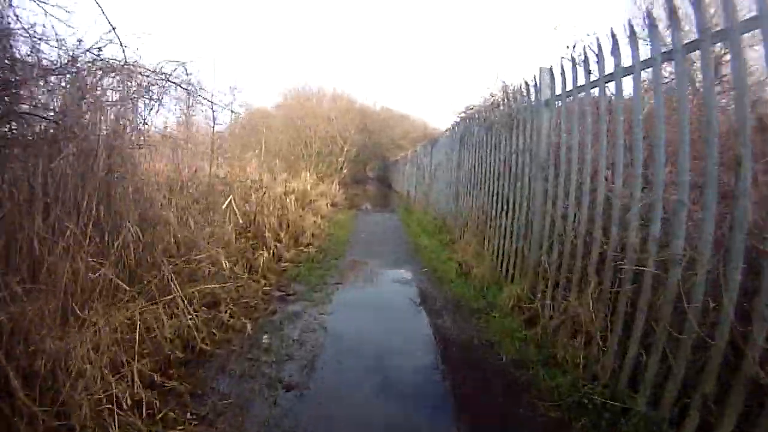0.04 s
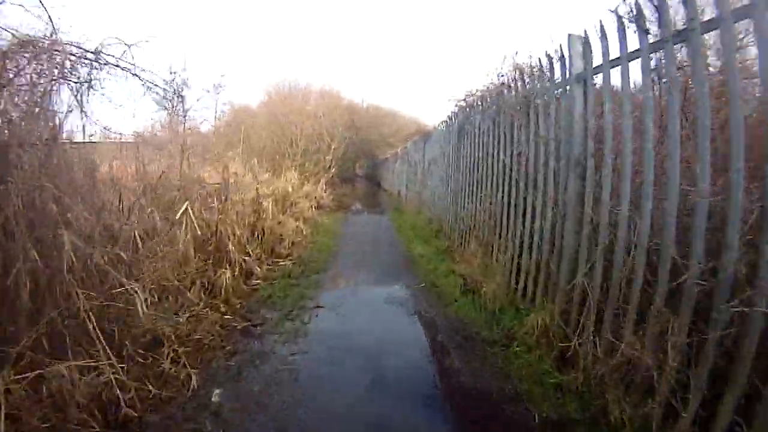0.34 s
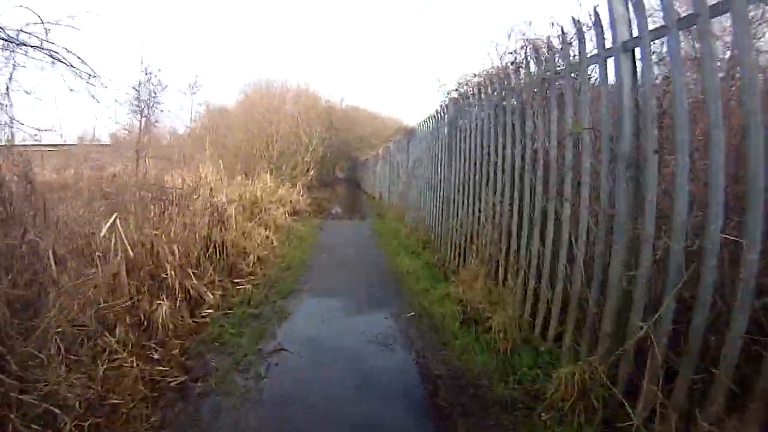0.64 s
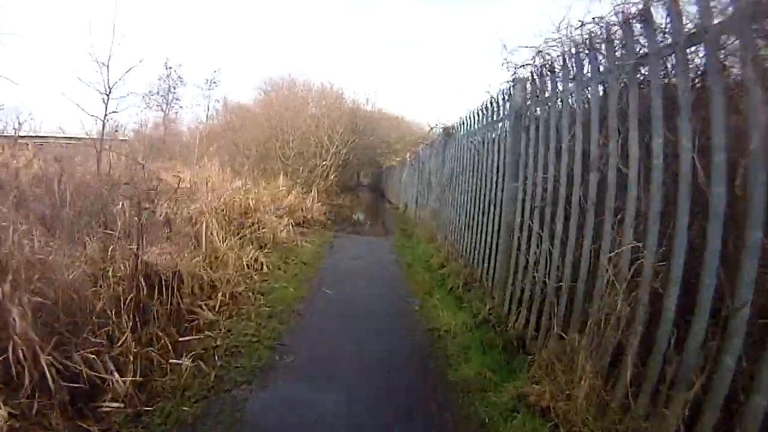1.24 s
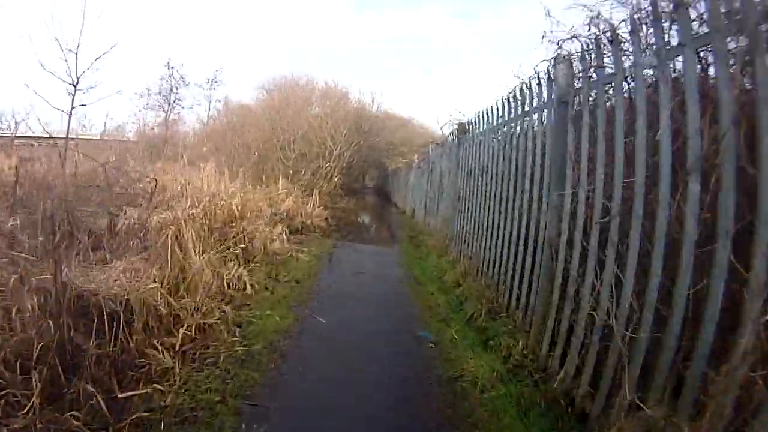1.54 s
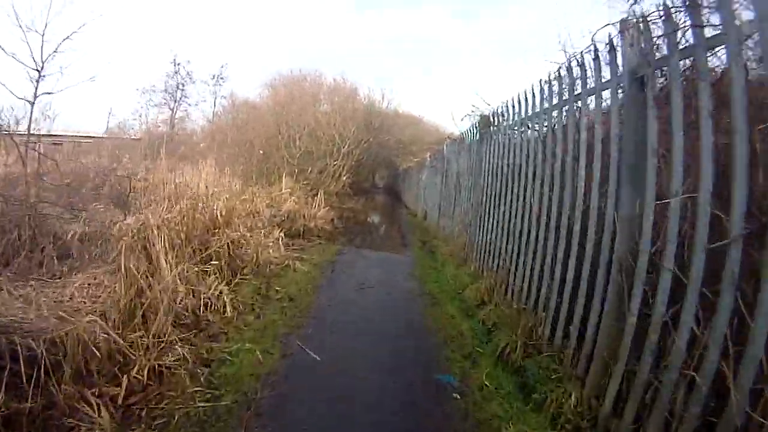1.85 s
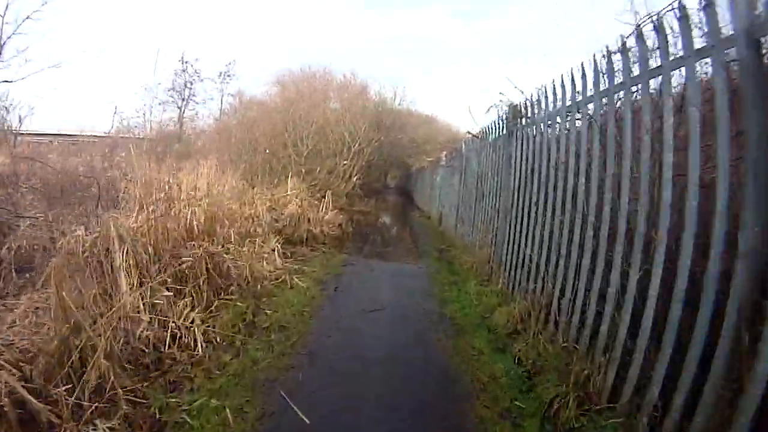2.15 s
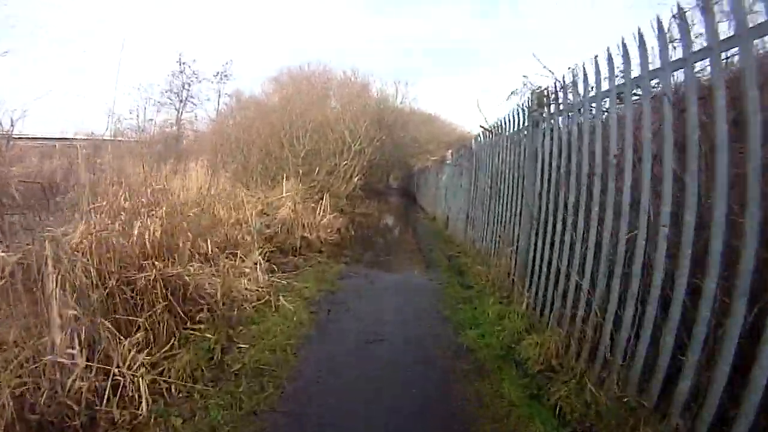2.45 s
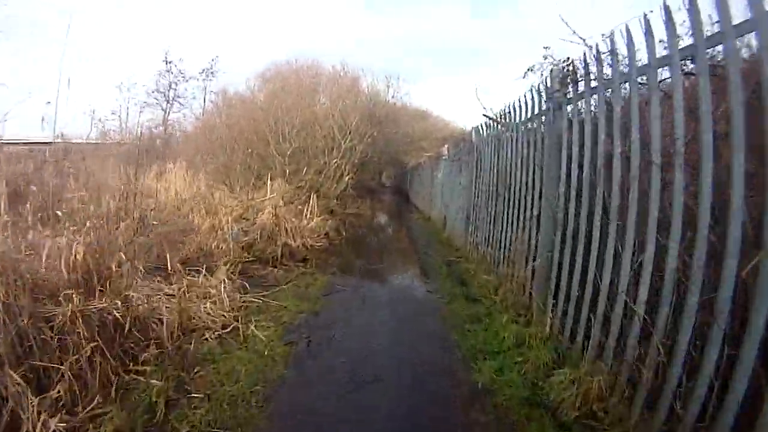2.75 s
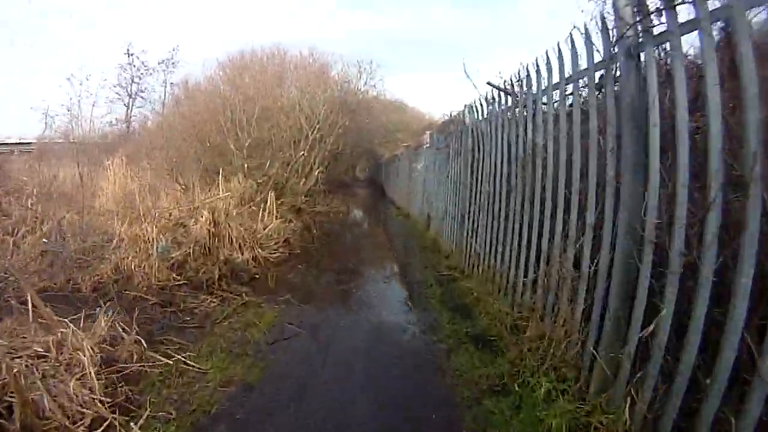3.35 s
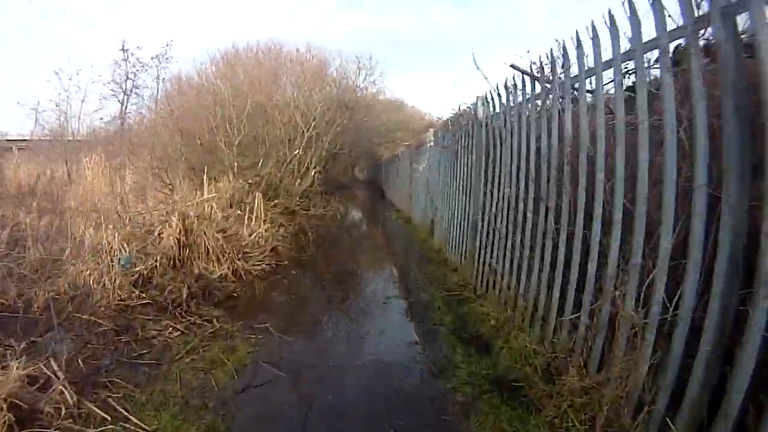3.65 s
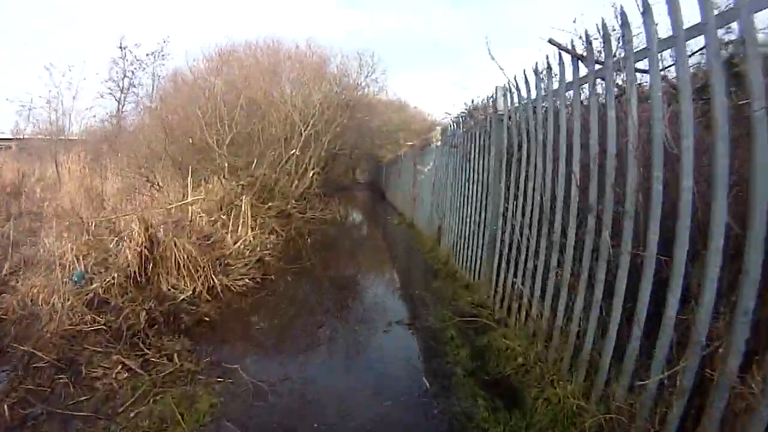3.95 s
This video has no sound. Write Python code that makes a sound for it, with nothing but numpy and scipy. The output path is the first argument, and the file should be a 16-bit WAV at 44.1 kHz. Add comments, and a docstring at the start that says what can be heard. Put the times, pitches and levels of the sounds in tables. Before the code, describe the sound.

A bicycle rolls through a long puddle, then hisses along wet tarmac in rumbling wind.

```python
"""A bicycle rolls through a long puddle onto wet tarmac, heard from a camera riding with it.
From the start the mount shakes at a low note under wind rumble and tyre hiss; the chain pings,
a loose fitting ticks, bumps rattle the bike. From 0.3 s the tyre churns water and throws spray.
By 2 s the puddle fades; the tyre hisses on, pings and ticks come more often.
Throughout, the recorder's sample-and-hold adds gritty treble."""
import sys
import numpy as np
from scipy import signal
from scipy.fft import rfft, irfft
from scipy.io import wavfile
from scipy.ndimage import uniform_filter1d

SR = 44100
rng = np.random.default_rng(int(sys.argv[2]) if len(sys.argv) > 2 else 0)


def pcm_store(signal):
    """Save signal as 16-bit PCM."""
    levels = np.round(np.clip(np.atleast_2d(signal), -1, 1) * 32767)
    wavfile.write(sys.argv[1], SR, levels.astype(np.int16).T)


N = 176400
TIME_S = np.arange(N) / SR

# churned water: (time [s], pitch [Hz], level [dB])
CHURN_CURVE = [(0,270.6,-53.5),(.24,285,-49),(.33,236.7,-43),(.55,203.8,-44),(.85,220,-44.5),(1.1,215,-43.5),(1.35,228,-43.5),(1.6,250.7,-46),(1.75,270,-44),(1.95,290.7,-50),(2.2,295,-67),(4,295.4,-100)]
# spray: (time [s], level [dB])
SPRAY_LEVEL = [(0,-63),(.27,-61.5),(.42,-49.5),(.62,-50),(.9,-47.5),(1.15,-47),(1.42,-49),(1.62,-51),(1.8,-57),(2.1,-58.5),(2.6,-62),(4,-62)]
# spray filter: (frequency [Hz], gain [dB])
SPRAY_EQ = [(100,-62),(400,-5),(800,-3.5),(1200,-2.5),(1700,-1),(2300,-4.5),(3200,-6),(4200,-9),(5400,-9)]
# water and grit hitting the bike, plus one broad tick of the loose fitting at 3.31 s: (time [s], level [dB],
# decay [s], centre [Hz], width [Hz])
SPLASH_HITS = [(0.3193,-43.5,.007,1300,2000),(0.373,-43,0.0032,1900,2200),(.404,-38,0.0024,2970,2600),(0.499,-46,0.004,2380,3180),(0.53,-44,0.0074,2450,2980),(.6853,-46,0.0036,2100,2000),(0.734,-41,.004,1700,2000),(0.901,-44,0.01,4440,1500),(1.102,-38.5,0.0094,1800,350),(1.134,-50,0.011,3400,3000),(1.403,-45,0.0087,2140,1000),(1.614,-47.5,0.0098,3230,650),(1.9705,-32.5,0.0019,2000,1860),(3.219,-49,0.0055,2720,3000),(3.3052,-38,.0014,1800,4460)]
# rolling tyres: (time [s], level [dB])
TYRE_LEVEL = [(0,-50.5),(.1,-48.5),(.24,-52),(.35,-50.5),(.8,-53.5),(1.45,-54.5),(1.7,-51.5),(1.9,-47.5),(2.1,-50.5),(2.6,-53.5),(3.1,-53.5),(3.6,-54.5),(4,-53.5)]
# tread hiss filter: (frequency [Hz], gain [dB])
TYRE_EQ = [(100,-10),(340,-4.5),(450,1),(700,-0.5),(900,1.5),(1120,3),(1400,-5),(2000,-20.5),(2350,-12.5),(2650,-7.5),(3100,-16.5),(4200,-22),(5400,-21)]
# links on the sprocket: (time [s], level [dB], pitch [Hz])
CHAIN_PINGS = [(0.0552, -53, 2600), (0.0921, -52, 2580), (0.162, -50.5, 2560), (0.4534, -49.5, 2630),
               (0.826, -44, 2600), (1.5933, -52, 2750), (1.649, -49, 2600), (1.7106, -48, 2500),
               (1.8461, -46.5, 2660), (2.0372, -56, 2600), (2.4077, -45.5, 2680), (2.4764, -51, 2780),
               (2.5256, -48, 2580), (2.5849, -53, 2560), (2.6513, -52, 2640), (2.7202, -51, 2550),
               (2.792, -48.5, 2610), (2.867, -51, 2550), (2.9403, -54, 2520), (3.0085, -49.5, 2540),
               (3.08, -53, 2720), (3.1506, -56, 2680), (3.2823, -45.5, 2590), (3.3498, -51, 2600),
               (3.375, -51, 2770), (3.4959, -52, 2730), (3.5627, -48.5, 2640), (3.634, -51, 2600),
               (3.652, -43, 2720), (3.7044, -48, 2630), (3.7714, -45.5, 2570), (3.7917, -54, 2700),
               (3.8396, -52, 2580), (3.909, -49, 2540), (3.934, -44.5, 2640), (3.9773, -49.5, 2660)]
# loose fitting contacts: (time [s], peak [dB])
FITTING_TICKS = [(0.0177, -40), (0.104, -42.5), (0.2664, -43), (0.4039, -42), (0.5704, -41), (0.6675, -36),
                 (0.9025, -40), (0.9564, -35), (1.7745, -38.5), (1.9182, -39), (1.9861, -58), (2.0759, -49),
                 (2.2034, -38.5), (2.2245, -43), (2.3687, -42), (2.463, -42), (2.4824, -40), (2.5029, -43),
                 (2.5523, -41.5), (2.6374, -40), (2.8102, -57), (2.8307, -41), (2.8654, -38), (2.888, -43),
                 (2.906, -42.5), (3.0576, -46), (3.3062, -52), (3.3276, -42), (3.3777, -42.5),
                 (3.3965, -45), (3.4205, -37.5), (3.761, -43), (3.856, -39.5), (3.8786, -44)]
# bumps: (time [s], level [dB], decay [s], tilt [dB/octave])
BUMPS = [(0.069,-59,.012,-9),(.162,-54.5,0.0067,-15.5),(.234,-52.5,0.0085,-9.5),(.399,-41.5,0.0094,-0.5),(1.104,-52,0.021,1),(1.131,-42.5,0.018,-0.5),(1.335,-41,0.014,1),(1.346,-49.5,0.014,7),(2.336,-48,0.028,1),(3.218,-48,.012,-2),(3.433,-46,0.022,0)]
# bike resonances: (frequency [Hz], width [Hz], gain [dB])
BIKE_MODES = [(770,130,-1.5),(1033,73,-2),(1650,115,-1.5),(1980,290,-9),(2600,110,-7),(3400,710,-16)]
# mount shake: (time [s], level [dB])
MOUNT_LEVEL = [(0,-36.5),(.42,-38.5),(.55,-34.5),(.69,-44),(.86,-37.5),(.94,-35.5),(1.14,-36),(1.21,-42),(1.33,-35.5),(1.42,-47),(1.49,-34.5),(1.64,-27.5),(1.72,-37.5),(2.14,-37),(2.22,-32),(2.3,-46.5),(2.36,-36),(2.65,-34.5),(2.74,-44.5),(2.8,-53),(2.85,-31.5),(2.92,-35.5),(3.02,-46),(3.08,-38),(3.22,-36.5),(3.27,-48),(3.33,-34.5),(3.41,-33),(3.54,-39),(3.6,-49),(3.68,-37),(3.78,-38),(3.87,-33),(4,-43.5)]
# wind rumble: (time [s], level [dB])
WIND_LEVEL = [(0,-40),(.3,-43),(.55,-39.5),(1.1,-41.5),(1.6,-42.5),(1.9,-40.5),(2.1,-45),(2.8,-45),(3.1,-46),(4,-44.5)]
# wind filter: (frequency [Hz], gain [dB])
WIND_EQ = [(20,-18),(40,-3),(85,1),(135,-5),(175,-4.5),(240,-5),(310,-13.5),(375,-13.5),(450,-28.5),(900,-21),(3000,-70)]


def from_db(db):
    """Decibels to gain."""
    return 10 ** (np.asarray(db) / 20)


def unit_rms(x):
    """Scale to rms 1."""
    return x / np.sqrt(np.mean(x ** 2) + 1e-20)


def levelled(x, window_s=0.0094):
    """Hold the running rms near 1."""
    power = uniform_filter1d(x * x, int(window_s * SR))
    return x / np.sqrt(np.abs(power) + 1e-20)


def per_sample(rows):
    """Interpolate a time table's columns at every sample."""
    times_s, *columns = np.transpose(rows)
    return [np.interp(TIME_S, times_s, column) for column in columns]


def drift(rate_hz):
    """Slow random wander, rms 1."""
    step, warmup = 40, 2000
    pole = np.exp(-2 * np.pi * rate_hz * step / SR)
    noise = rng.standard_normal(N // step + warmup + 2)
    slow = signal.lfilter([1], [1, -2 * pole, pole * pole], noise)[warmup:]
    return np.interp(np.arange(N) / step, np.arange(len(slow)), unit_rms(slow))


def equalised(x, eq):
    """Filter by a gain table; rms 1."""
    hz, db = np.transpose(eq)
    bins_hz = np.maximum(np.arange(N // 2 + 1) * SR / N, 1)
    gain = from_db(np.interp(np.log(bins_hz), np.log(hz), db))
    return unit_rms(irfft(rfft(x) * gain, N))


def resonate(x, hz, width_hz):
    """Two-pole band-pass, peak gain 1."""
    r, w = np.exp(-np.pi * width_hz / SR), 2 * np.pi * hz / SR
    return signal.lfilter(np.array([1, 0, -1]) * (1 - r * r) / 2, [1, -2 * r * np.cos(w), r * r], x + 1e-18)


def ring(clicks, hz, t60_s):
    """Each click starts a decaying sine."""
    r, w = np.exp(-np.log(1000) / (t60_s * SR)), 2 * np.pi * hz / SR
    return signal.lfilter([0, np.sin(w)], [1, -2 * r * np.cos(w), r * r], clicks + 1e-18)


def narrow_noise(hz, width_hz):
    """Noise band with a movable centre; rms 1."""
    phase = 2 * np.pi * np.cumsum(hz * np.ones(N)) / SR
    return drift(width_hz / 2) * np.cos(phase) + drift(width_hz / 2) * np.sin(phase)


def burst(start_s, decay_s, rise_s):
    """Linear rise, exponential fall."""
    age_s = np.maximum(TIME_S - start_s, 0)
    return np.minimum(age_s / rise_s, 1) * np.exp(-np.minimum(age_s / decay_s, 20))


def churn():
    """Water pushed aside by the tyre gurgles hollowly, lower where it is deep."""
    hz, db = per_sample(CHURN_CURVE)
    return from_db(db) * narrow_noise(hz, width_hz=76)


def spray(drops_per_s=2600, spread_db=3, t60_cycles=6.6, spatter_db=-2.5, mist_db=5.5, surge_db=1.0):
    """Thousands of drops, each ringing a few cycles, plus spatter and fine mist."""
    db, = per_sample(SPRAY_LEVEL)
    sizes = from_db(spread_db * np.minimum(rng.exponential(1, N), 5)) * rng.choice([-1, 1], N)
    drops = sizes * (rng.random(N) < drops_per_s / SR)
    pitches_hz = np.geomspace(600, 5500, 20)
    pitch_index = rng.integers(0, len(pitches_hz), N)
    patter = np.zeros(N)
    for k, hz in enumerate(pitches_hz):
        patter += np.sqrt(hz) * unit_rms(ring(drops * (pitch_index == k), hz, t60_cycles / hz))
    water = unit_rms(patter) + from_db(spatter_db) * spatter()
    water += from_db(mist_db) * rng.standard_normal(N)
    return from_db(db + surge_db * drift(rate_hz=17)) * equalised(water, SPRAY_EQ)


def spatter(gobs_per_s=110, decay_s=0.0027, bands=6):
    """Larger gobs land at random, each a short puff in one band; rms 1."""
    out = np.zeros(N)
    pole = np.exp(-1 / (decay_s * SR))
    for hz in np.geomspace(1100, 4300, bands):
        hits = (rng.random(N) < gobs_per_s / bands / SR) * rng.uniform(.5, 1, N)
        envelope = signal.lfilter([1], [1, -pole], hits + 1e-18)
        out += envelope * levelled(resonate(rng.standard_normal(N), hz, width_hz=900))
    return unit_rms(out)


def splashes():
    """Flung water and grit slap and plink against the bike; one broad tick of the loose fitting sounds among
    them."""
    out = np.zeros(N)
    for start_s, db, decay_s, hz, width_hz in SPLASH_HITS:
        noise = resonate(resonate(rng.standard_normal(N), hz, width_hz), hz, width_hz)
        out += from_db(db) * burst(start_s, decay_s, rise_s=0.0011) * levelled(noise)
    return out


def tyres(rough_db=1.78, hum_db=-8):
    """Tread hisses on wet ground, with a hollow hum."""
    db, = per_sample(TYRE_LEVEL)
    hiss = equalised(rng.standard_normal(N) * from_db(rough_db * drift(rate_hz=62)), TYRE_EQ)
    hum = from_db(hum_db) * narrow_noise(hz=574.2, width_hz=44)
    return from_db(db) * (hiss + hum)


def chain(rise_s=0.0016, scrape_db=-10.5):
    """Links brush the sprocket: short pings near one pitch, each with a little scrape."""
    out = np.zeros(N + SR)
    age_s = np.arange(SR // 20) / SR
    envelope = age_s / rise_s * np.exp(1 - age_s / rise_s)
    for start_s, db, hz in CHAIN_PINGS:
        start = int(start_s * SR)
        tone = np.sin(2 * np.pi * hz * age_s)
        scrape = unit_rms(resonate(rng.standard_normal(len(age_s)), hz, width_hz=980))
        out[start:start + len(age_s)] += from_db(db) * envelope * (tone + from_db(scrape_db) * scrape)
    return out[:N]


def fitting(hz=3580):
    """A loose fitting ticks: tiny bright contacts that die at once."""
    times_s, db = np.transpose(FITTING_TICKS)
    clicks = np.zeros(N)
    clicks[(times_s * SR).astype(int)] = from_db(db)
    ringing = ring(signal.unit_impulse(SR // 100), hz, t60_s=0.0016)
    tick = resonate(ringing, hz, width_hz=5600)
    return signal.lfilter(tick / np.abs(tick).max(), [1], clicks)


def rattles(pivot_hz=1700):
    """Bumps set contacts buzzing in the bike's resonances; soft bumps favour the low ones."""
    _, bump_db, _, tilt_db_per_octave = np.transpose(BUMPS)
    envelopes = np.array([burst(start_s, decay_s, rise_s=0.0028) for start_s, _, decay_s, _ in BUMPS])
    out = np.zeros(N)
    for hz, width_hz, mode_db in BIKE_MODES:
        force = from_db(bump_db + mode_db + tilt_db_per_octave * np.log2(hz / pivot_hz)) @ envelopes
        out += force * levelled(resonate(rng.standard_normal(N), hz, width_hz))
    return out


def mount(swing_hz=48.07, sway_hz=38.3, sway_db=-12.5, wander_hz=6.13):
    """The mount swings at a wandering low note that beats with a slower sway."""
    db, = per_sample(MOUNT_LEVEL)
    pitches_hz = [hz + wander_hz * np.tanh(drift(rate_hz=11.6)) for hz in (swing_hz, sway_hz)]
    swing, sway = np.sin(2 * np.pi * np.cumsum(pitches_hz, axis=1) / SR)
    return from_db(db) * unit_rms(swing + from_db(sway_db) * sway)


def wind(lumps_db=0.5):
    """Lumpy rumble of air on the case."""
    db, = per_sample(WIND_LEVEL)
    air = rng.standard_normal(N) * from_db(lumps_db * drift(rate_hz=6.1))
    return from_db(db) * equalised(air, WIND_EQ)


def scene():
    """Mono sum; all sources close, in open air."""
    riding = mount() + wind() + churn() + spray() + tyres()
    return (riding + chain() + fitting() + rattles() + splashes())[None]


def record(dry, input_edge_hz=5390, hold_hz=12000, cutoff_hz=15350):
    """Slow sample-and-hold mirrors the sound into the treble; a low-pass cuts the top."""
    band = signal.sosfilt(signal.butter(16, input_edge_hz, fs=SR, output="sos"), dry)
    sampled = signal.resample(band, N * hold_hz // SR, axis=-1)
    held = np.repeat(sampled, 4, axis=-1)
    low_pass = signal.ellip(12, .1, 80, cutoff_hz, fs=SR, output="sos")
    return signal.sosfilt(low_pass, signal.resample(held, N, axis=-1))


dry = scene()
out = record(dry)
pcm_store(out)
```